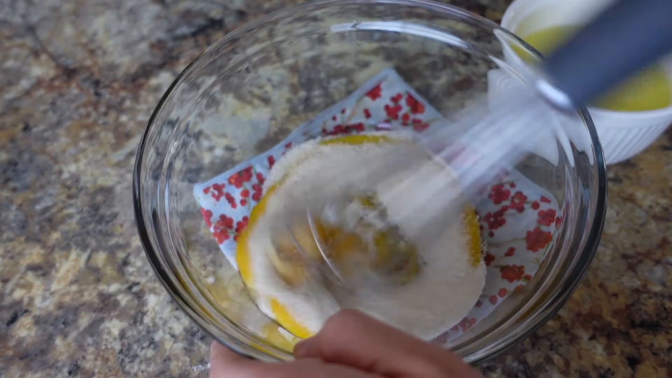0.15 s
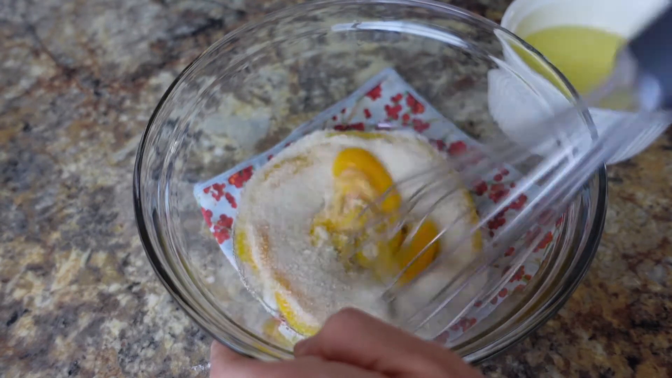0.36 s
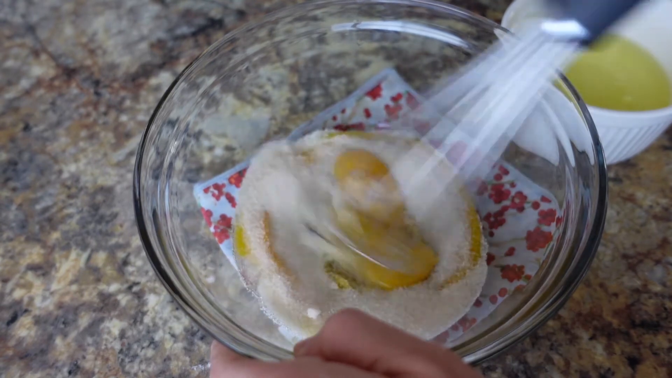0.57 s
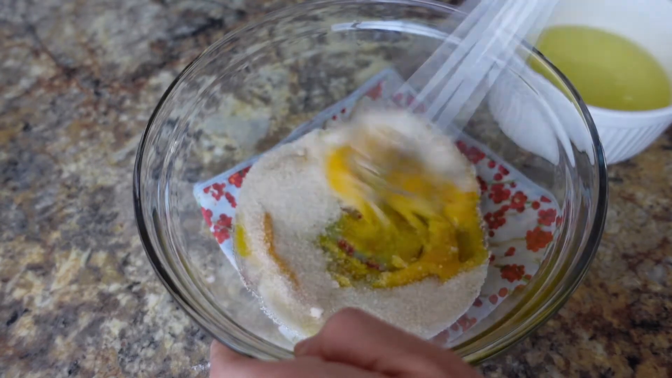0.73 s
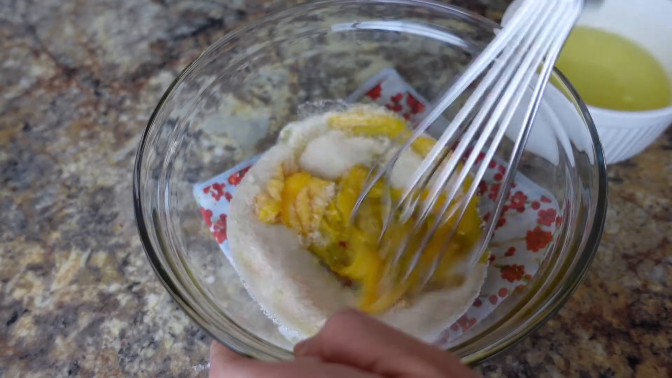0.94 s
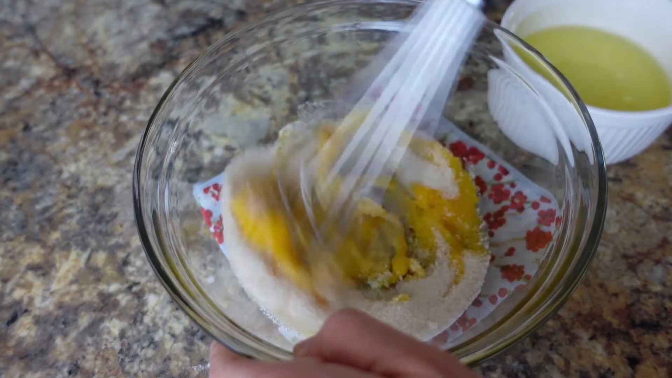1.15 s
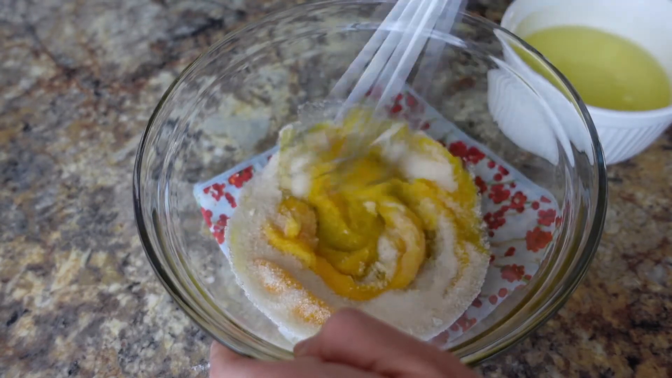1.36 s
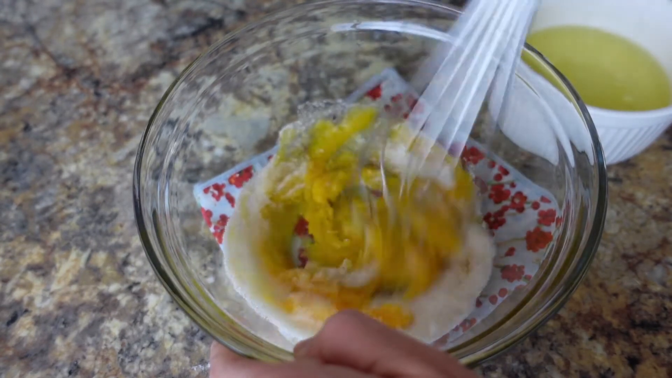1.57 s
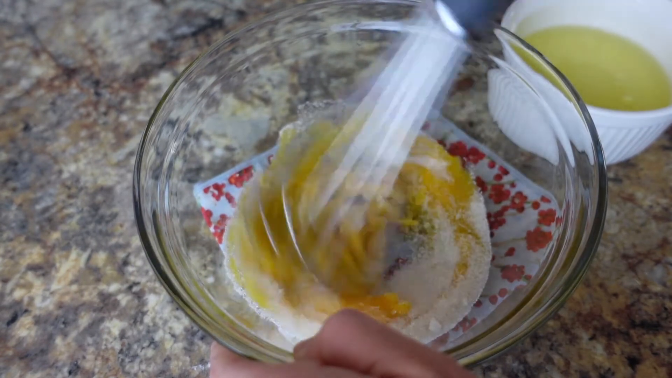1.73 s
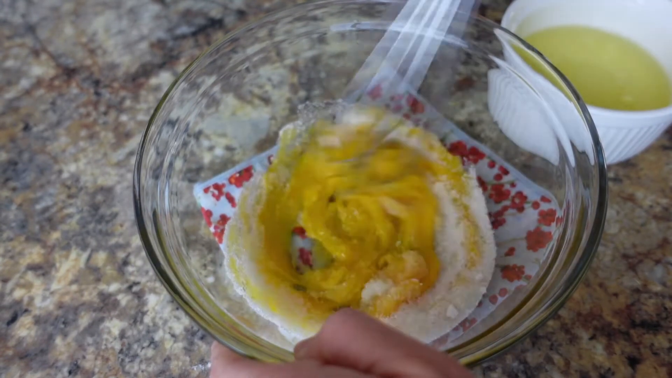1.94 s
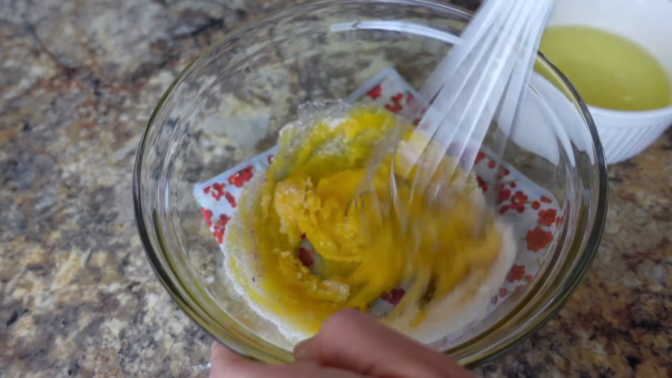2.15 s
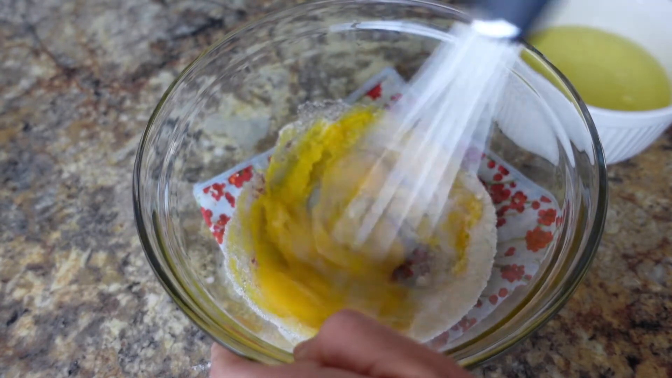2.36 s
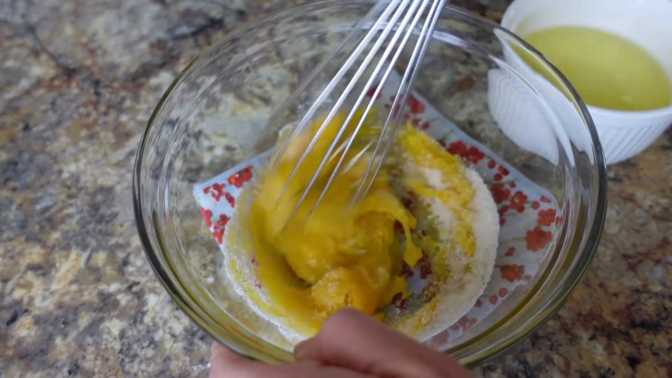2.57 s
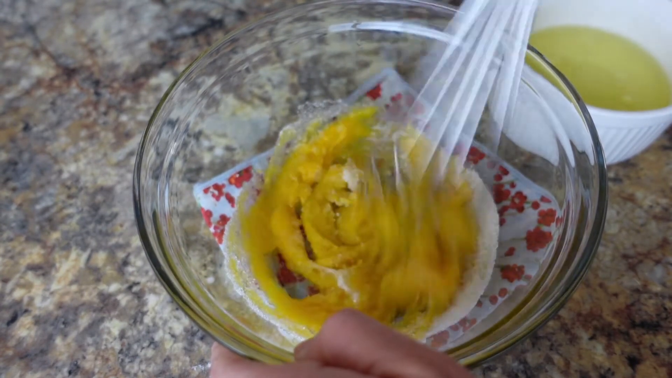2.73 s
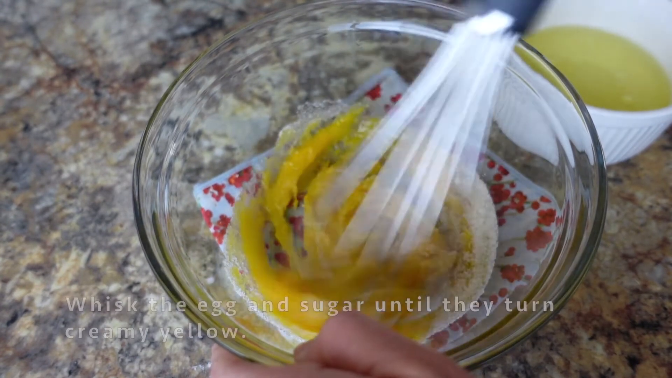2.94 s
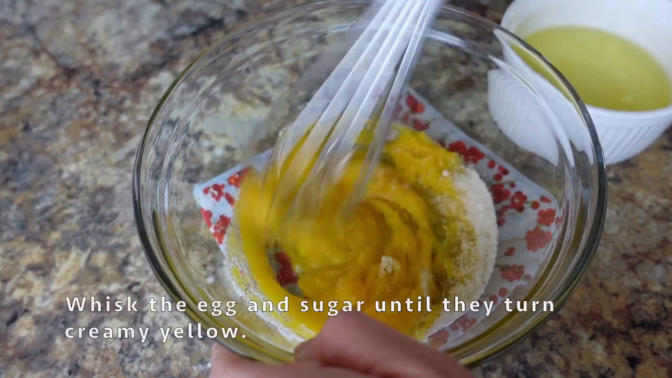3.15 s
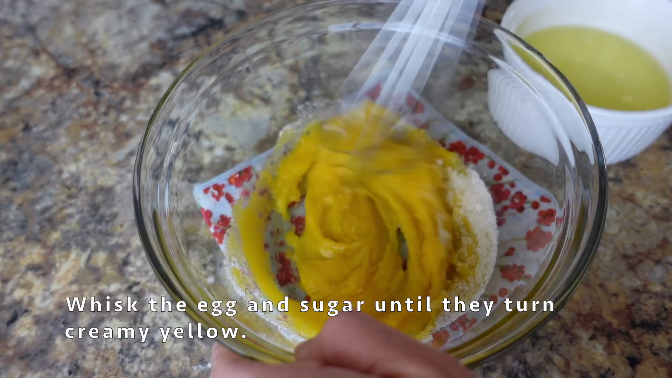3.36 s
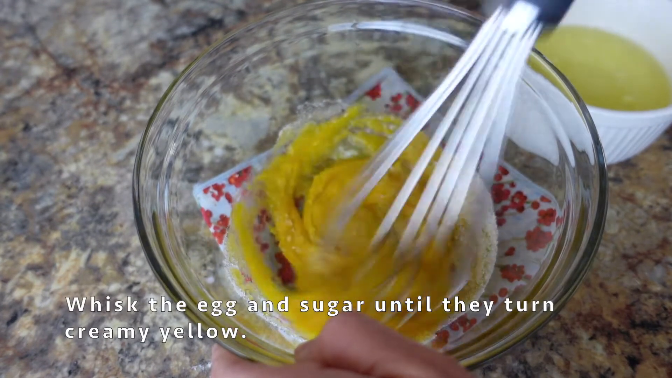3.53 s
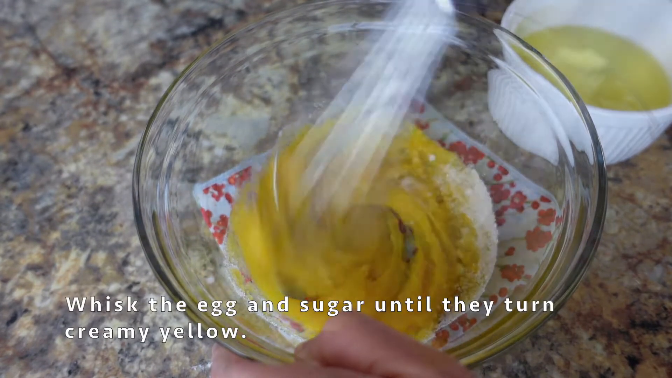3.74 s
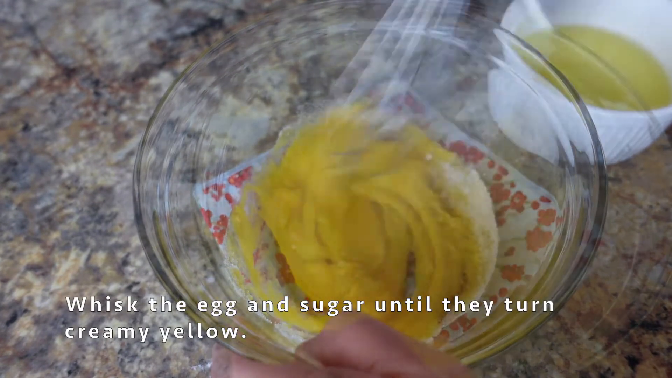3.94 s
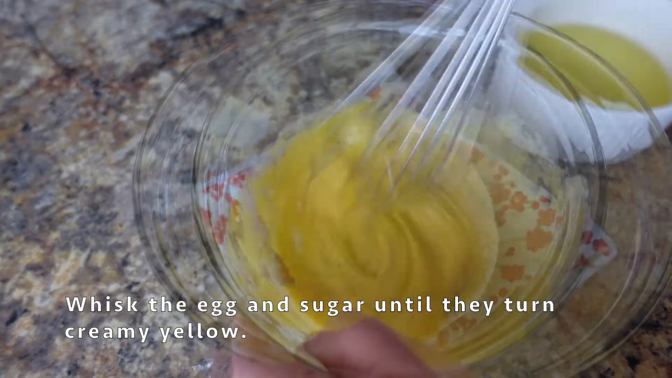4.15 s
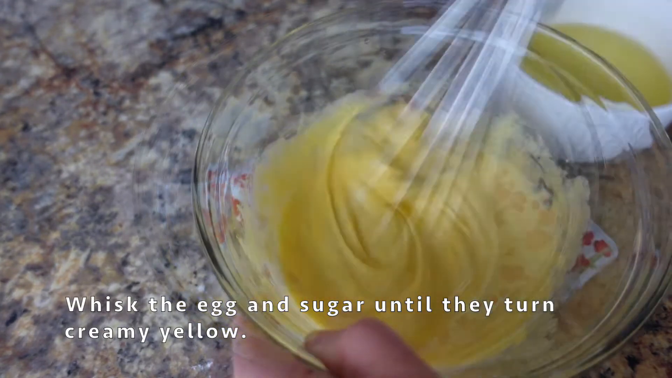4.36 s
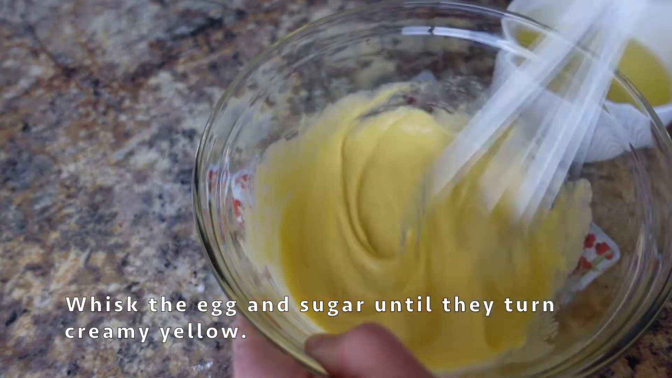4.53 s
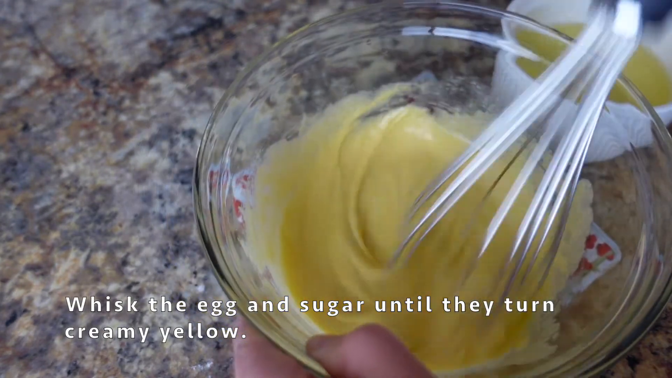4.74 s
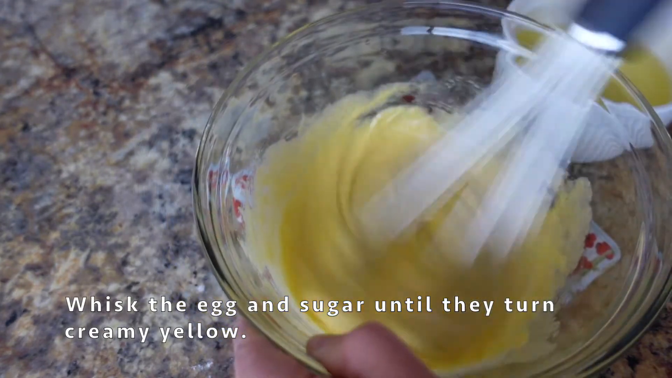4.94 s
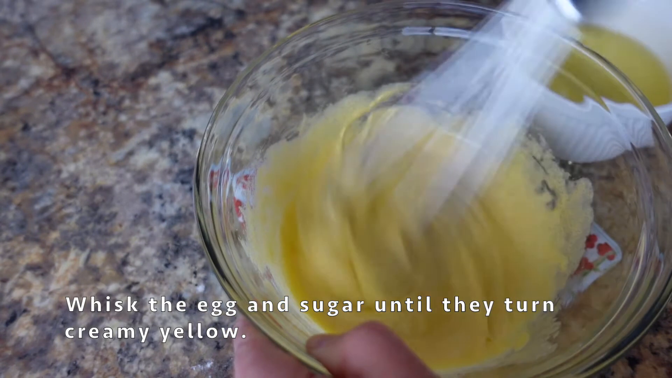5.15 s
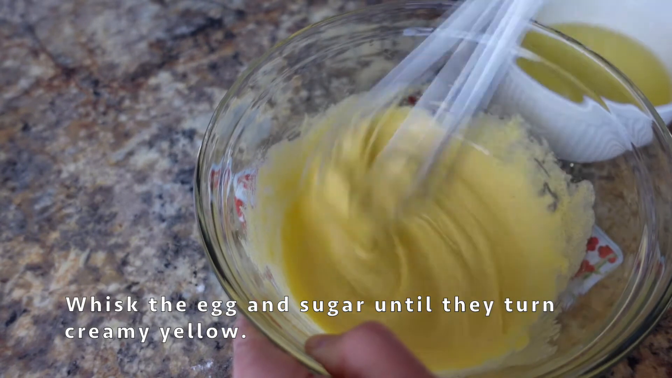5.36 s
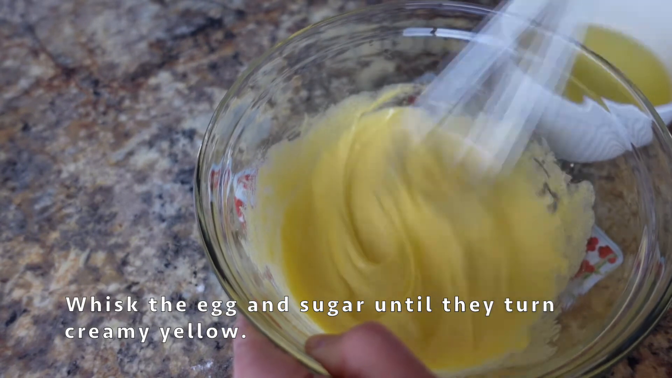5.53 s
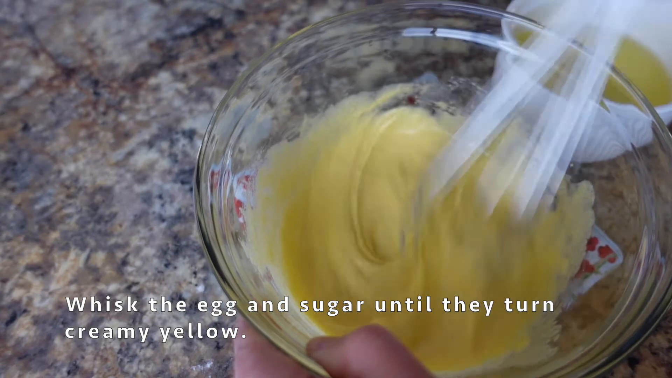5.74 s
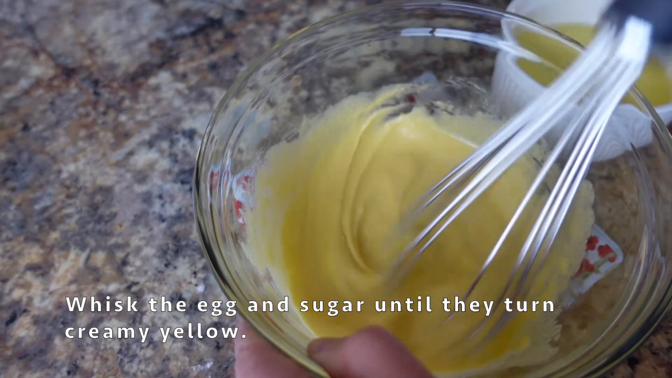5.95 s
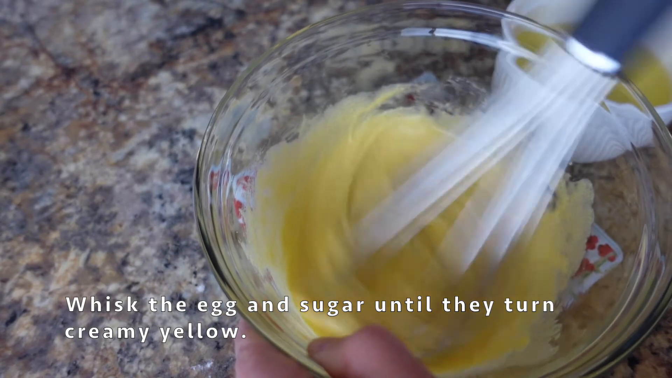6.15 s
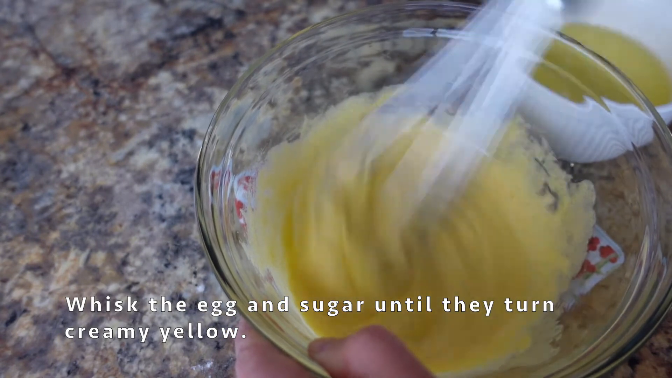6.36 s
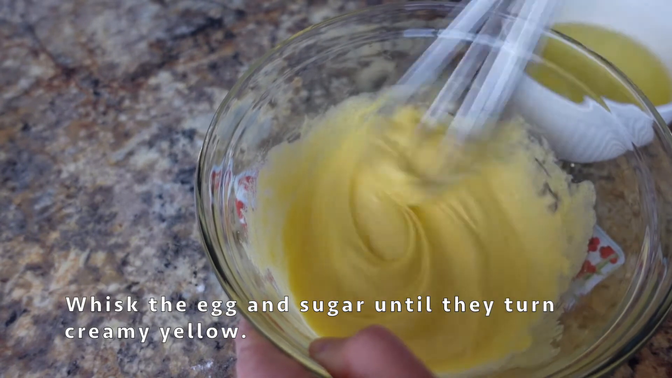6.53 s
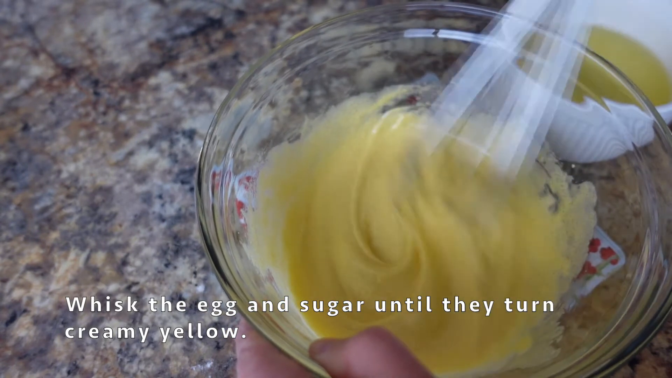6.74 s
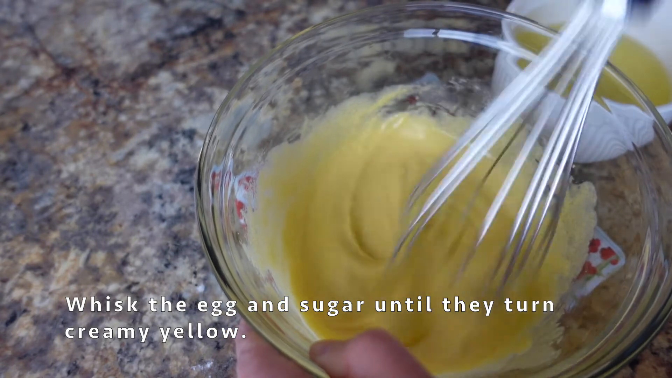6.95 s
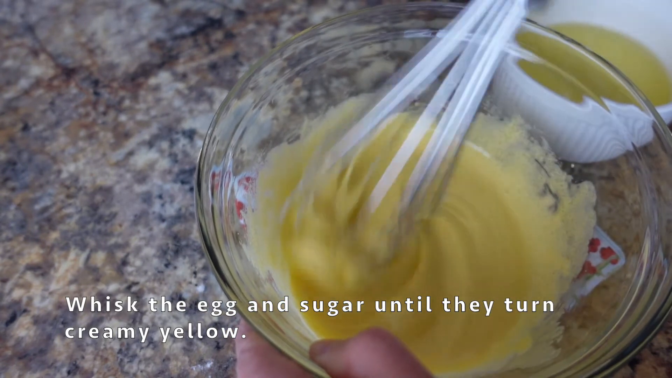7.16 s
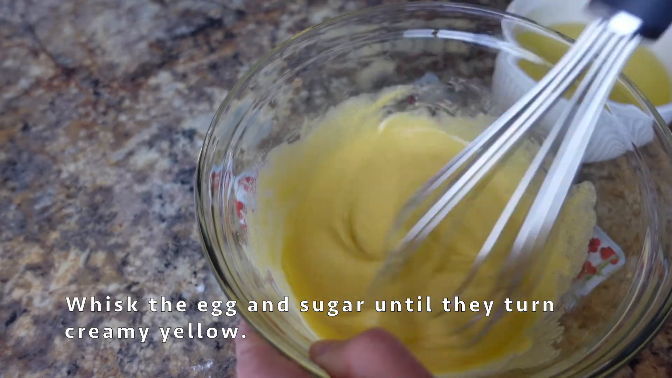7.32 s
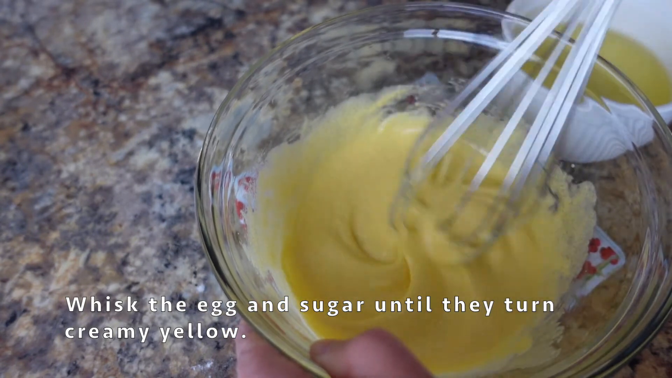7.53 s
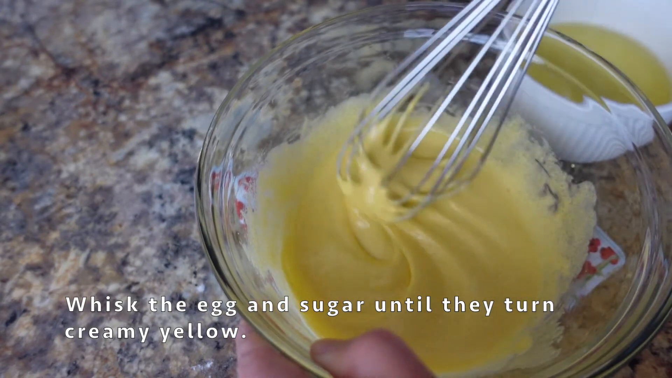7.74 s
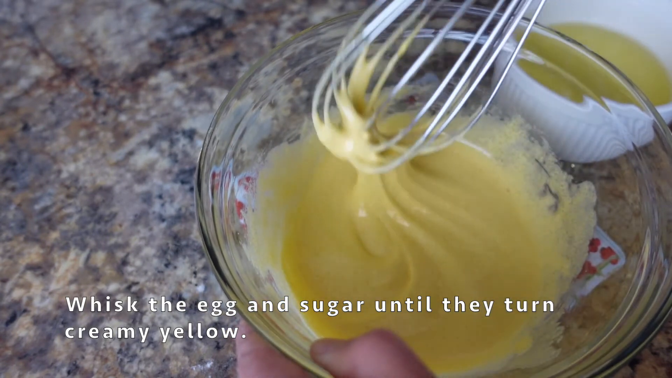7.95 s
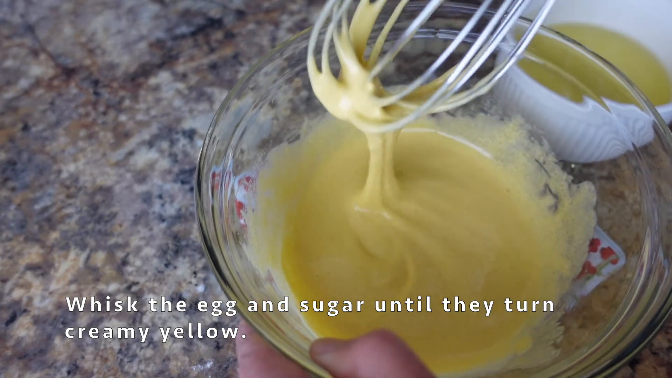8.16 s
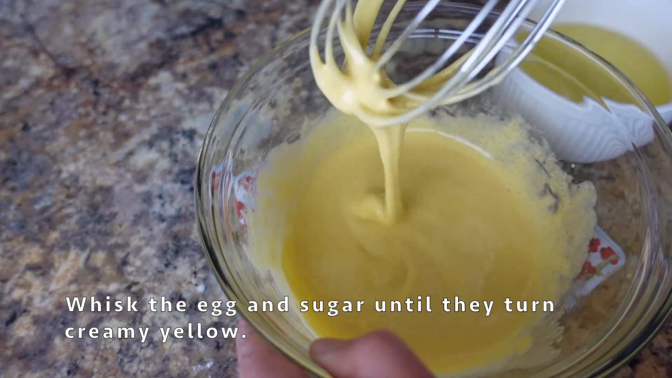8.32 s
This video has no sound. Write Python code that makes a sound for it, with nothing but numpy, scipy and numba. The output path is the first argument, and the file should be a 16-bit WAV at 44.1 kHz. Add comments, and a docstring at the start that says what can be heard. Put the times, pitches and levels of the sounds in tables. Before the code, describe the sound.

Close, fast hand whisking in a glass bowl on a counter: first grainy swishes with few clinks, then a busy, harsh clatter of wires on glass, then rounder, lower-ringing beats about four turns a second. Dull thumps sit underneath. Near the end come weak ticks and a soft scrape, then only quiet hum and hiss. Short hard-walled room echo.

```python
"""At first a whisk drags through dry sugar in a glass bowl: noise-like grains excite resonant modes, the low
ones gliding. Blows (quick patters of wires), long and short, ring the same modes, and the grinding eases twice
in each turn. As yolk wets the sugar the mix turns gritty, then creamy: mode levels and damping change, and the
bowl knocks on the counter as decaying sines over low shaking. Last the whisk lifts out and the force falls
away. Short wall echoes follow the glass, and an appliance's hum and hiss, made of shaped noise, lasts
throughout; the stereo microphone is close."""
import sys
import numpy as np
from scipy import signal
from scipy.fft import rfft, irfft
from scipy.io import wavfile
from scipy.ndimage import uniform_filter1d
from numba import njit

SR = 44100
rng = np.random.default_rng(int(sys.argv[2]) if len(sys.argv) > 2 else 0)


def dump_mix(stems):
    """Bounce the given channels to the path in sys.argv[1] as a 16-bit WAV at rate SR."""
    frames = np.atleast_2d(stems).T  # one column per channel
    limited = np.clip(frames, -1, 1)  # hard clip at full scale
    pcm = np.round(limited * 32767).astype(np.int16)
    wavfile.write(sys.argv[1], SR, pcm)


N = 374394
T = np.arange(N) / SR
DRY_UNTIL_S, GRITTY_FROM_S, GRITTY_UNTIL_S, CREAMY_FROM_S = .8, 1.0, 4.0, 4.502
STAGE_S = (DRY_UNTIL_S, GRITTY_FROM_S, GRITTY_UNTIL_S, CREAMY_FROM_S)
LOW_HZ = 1200  # modes below this count as the low ring


def undb(db):
    """Level: amplitude gain is the exponential of decibels."""
    return np.exp(np.asarray(db) * (np.log(10) / 20))


def unit(x):
    """Normalisation: scale to an rms value of 1."""
    return x / np.sqrt(np.mean(x ** 2))


def on_log(hz, table):
    """Logarithmic pitch scale: interpolate (f/Hz, value) rows over log frequency."""
    table_hz, values = np.transpose(table)
    return np.interp(np.log(hz), np.log(table_hz), values)


@njit
def ring(x, hz, width):
    """Resonance: a state-variable band-pass with moving centre and width, gain 1 at the centre."""
    y, band, low = np.empty(len(x)), 0., 0.
    for i in range(len(x)):
        g = np.tan(np.pi * hz[i] / SR)
        k = width[i] / hz[i]
        v = (band + g * (x[i] - low)) / (1 + g * (g + k))
        band = 2 * v - band
        low = low + 2 * g * v
        y[i] = k * v
    return y


def resonant_noise(hz, width):
    """Random excitation: one fixed resonance driven by white noise, at rms 1."""
    return unit(ring(rng.standard_normal(N), np.full(N, float(hz)), np.full(N, float(width))))


def walk(rate):
    """Slow modulation: random levels held 1 / rate s and smoothed twice; spread near 1."""
    hold = int(SR / rate)
    steps = np.repeat(rng.standard_normal(N // hold + 1), hold)
    return 1.06 * uniform_filter1d(uniform_filter1d(steps, hold), hold)[:N]


# spectrum of the kitchen, before its overall level is set: (f/Hz, spectral level/dB per Hz)
KITCHEN_SPECTRUM = [(30, -29), (118, -10), (194, -7.5), (239, 0), (374, -14), (2230, -17), (2680, -27.5),
                    (8080, -36.5), (16000, -37)]
KITCHEN_DB = -60  # rms level


def kitchen():
    """Stationary noise: shaped hum and hiss of an appliance, its bass nearly alike left and right."""
    hz = np.maximum(np.fft.rfftfreq(N, 1 / SR), 1)
    mid, side = rfft(rng.standard_normal((2, N))) * undb(on_log(hz, KITCHEN_SPECTRUM))
    side = side * np.clip(hz / 900, .2, 1)
    return unit(irfft(np.array([mid + side, mid - side]), N)) * undb(KITCHEN_DB)


def walls(x, t60=0.11, level_db=-13):
    """Reverberation: counter and cupboards return dense, decaying echoes; the treble differs in each ear."""
    t = np.arange(SR // 4) / SR
    decay = np.exp(-np.log(1000) * t / t60) * (t > .002)
    echo = rng.standard_normal((2, len(t))) * decay
    mid, side = echo / np.sqrt(np.sum(echo ** 2, axis=1, keepdims=True))
    side = 0.79 * signal.lfilter([1, -.4], [1], side)
    echo = np.array([mid + side, mid - side])
    return undb(level_db) * signal.fftconvolve(x, echo, axes=1)[:, :N]


# resonances of the counter shaken by stirring: (f/Hz, bandwidth/Hz, level/dB before the stirring force)
COUNTER_MODES = [(121, 29, -4.5), (162, 17, -4)]
SHAKE_DB = -37.5  # shaking relative to the force of the wires


def counter_shaking(drag_db):
    """Forced vibration: low resonances of the counter follow the stirring force and flutter."""
    flutter_db = 6 * walk(18)
    shaking = sum(undb(db) * resonant_noise(hz, width) for hz, width, db in COUNTER_MODES)
    return shaking * undb(uniform_filter1d(drag_db, 4096) + SHAKE_DB + flutter_db)


JOLT_DB, JOLT_S = -45, 0.022  # level relative to the blow's force; decay time constant


def counter_jolts():
    """Impulse response: each blow starts an exponentially dying burst of resonant noise."""
    force = np.zeros(N)
    blow_s, blow_db = np.array(BLOWS)[:, :2].T
    force[(blow_s * SR).astype(int)] = undb(blow_db + JOLT_DB)
    force = signal.lfilter([1], [1, -np.exp(-1 / (JOLT_S * SR))], force)
    return force * resonant_noise(190, 200)


# the bowl rocks on the counter: (t/s, envelope peak level/dB before rattle and sway, f/Hz)
KNOCKS = [(0.147, -37, 129), (2.443, -39.5, 178), (2.677, -40.5, 160), (2.844, -34.5, 125),
          (3.135, -39, 162), (3.777, -33, 165), (3.989, -36, 164), (5.918, -34, 168), (6.179, -35.5, 180),
          (6.822, -38, 139), (7.106, -30.5, 131)]
SETTLE_S = .009  # a knock swells for this long as the foot settles, then fades


def foot_knocks():
    """Transient vibration: each knock of the bowl's foot is a swelling, fading sine, roughened by rattle."""
    t = np.arange(SR // 4) / SR
    envelope = np.e * t / SETTLE_S * np.exp(-t / SETTLE_S)
    rattle = undb(4 * walk(90))
    out = np.zeros(N)
    for s, db, hz in KNOCKS:
        at = int(s * SR)
        knock = envelope * np.sin(2 * np.pi * hz * t)
        out[at:at + len(t)] += undb(db) * rattle[at:at + len(t)] * knock
    return out


SWAY_DB = 2.4  # spread of the left minus right level


def counter(drag_db):
    """Structure-borne sound: shaking, jolts and knocks wander left and right as the bowl rocks."""
    out = counter_shaking(drag_db) + counter_jolts() + foot_knocks()
    return out * undb(SWAY_DB * walk(22) * np.array([[.5], [-.5]]))


# how hard the wires press through the mix, before easing: (t/s, force level/dB)
PRESSURE = [(0, -20.5), (.12, -26.5), (.35, -20.5), (.6, -24), (1.04, -19), (1.5, -19.5), (2.1, -16),
            (2.8, -12), (3.5, -13), (4.2, -15), (4.9, -14.5), (5.25, -20.5), (6.1, -15.5), (6.85, -17.5),
            (7.25, -27), (7.33, -35.5), (7.56, -33.5), (7.68, -45), (7.95, -61.5)]
# each turn around the bowl ends as the wires ease off and come down again: (t/s, easing/dB)
TURNS = [(.19, 4.5), (0.555, 7), (.7, 5), (1.245, 2.5), (1.51, 3), (1.8, 4), (1.985, 5), (2.297, 9.5),
         (2.56, 0.5), (2.75, 4.5), (2.96, 5.5), (3.25, 3.5), (3.879, 5.5), (4.11, 0.5), (4.3, 7.5),
         (4.535, 8.5), (4.77, 6.5), (5.007, 9), (5.237, 5), (5.505, 11), (5.745, 11), (6.0, 10),
         (6.237, 18), (6.478, 13.5), (6.711, 6.5), (6.961, 7)]
EASE_S, LAND_S = 0.053, 0.03
FAR_SIDE_SHARE, FAR_SIDE_S = 0.077, 0.043  # depth of the far-side easing; half its duration


def stirring():
    """Periodic forcing: the drag in dB sinks towards the end of each turn and, less, at its far side."""
    force_db = np.interp(T, *np.transpose(PRESSURE), right=-120)
    end_s, ease_db = np.transpose(TURNS)
    far_s = (end_s + np.append(end_s[1:], end_s[-1])) / 2
    for s, far, db in zip(end_s, far_s, ease_db):
        force_db = force_db - db * np.interp(T - s, (-EASE_S, 0, LAND_S), (0, 1, 0))
        force_db = force_db - FAR_SIDE_SHARE * db * np.maximum(1 - abs(T - far) / FAR_SIDE_S, 0)
    return force_db


SNAGS_PER_S, SNAG_DB, SNAG_MS = 90, 13, 3.75  # highest rate; largest size; decay time constant


def grit(snags_per_s, share=.2, size_db=2.5):
    """Stick-slip: grains crack at random, in uneven slips; wires catch on sugar lumps and spring free."""
    signs = np.sign(rng.random(N) - .5) * (rng.random(N) < share)
    grains = signs * undb(size_db * np.minimum(rng.exponential(size=N), 5.5))
    snags = (rng.random(N) < snags_per_s / SR) * undb(SNAG_DB) * rng.random(N)
    snags = signal.lfilter([1], [1, -np.exp(-1000 / (SNAG_MS * SR))], snags)
    slips = undb(np.minimum(3 * walk(130), 6.0))
    return unit(grains * (slips + snags))


def grinding(drag_db, hz, width):
    """Distributed excitation: half the grain power shakes every mode, half only a few neighbours."""
    whole = grit(SNAGS_PER_S * .2) * undb(drag_db - 3)
    parts = [grit(SNAGS_PER_S) * undb(drag_db - 3) for _ in range(6)]
    drive = np.empty((len(hz), N))
    for k in range(len(hz)):
        # the contact skips over the glass, so each mode flares by itself
        flare_db = np.minimum(2.63 * walk(12) + 2.58 * walk(50), 5.5)
        drive[k] = (whole + parts[6 * k // len(hz)]) * undb(flare_db)
    # cream keeps the grains off the clear rings
    cream_db = np.interp(T, (GRITTY_UNTIL_S, CREAMY_FROM_S), (0, -4.5))
    drive[(hz < LOW_HZ) | (width < 150)] *= undb(cream_db)
    return drive


# under dry sugar the low ring slides with the heap it carries; pitch relative to the last row: (t/s, f/Hz)
SLIDE = [(.06, 910), (.142, 840), (.384, 865), (.544, 818), (.718, 930), (.876, 863), (1, 880)]


def loaded_modes(hz, width):
    """Mass loading and damping: sugar slides the low modes, narrows them and smothers the high ones."""
    pitch = np.repeat(hz[:, None], N, axis=1)
    pitch[hz < LOW_HZ] *= np.interp(T, *np.transpose(SLIDE)) / SLIDE[-1][1]
    loss = np.repeat(width[:, None], N, axis=1)
    loss[hz < LOW_HZ] *= np.interp(T, (DRY_UNTIL_S, GRITTY_FROM_S), (.55, 1))
    loss[hz > 5500] *= np.interp(T, (DRY_UNTIL_S, GRITTY_FROM_S), (2.5, 1))
    return pitch, loss


def patter(ms, length, rise_ms=1.5, bounce_ms=9, bounce_db=-15, share=.3, first_db=10):
    """Multiple impact: the first wire lands hard, others follow for ms, then they chatter away."""
    t_ms = np.arange(length) / SR * 1000
    chatter = undb(bounce_db) * np.exp(-(t_ms - ms) / bounce_ms)
    shape = np.where(t_ms < ms, np.exp(-.3 * t_ms / ms), chatter)
    ticks = (2 * rng.random(length) - 1) * (rng.random(length) < share) * np.sqrt(3 / share)
    ticks[int(rise_ms * SR / 1000)] = undb(first_db)
    return np.minimum(t_ms / rise_ms, 1) * shape * ticks


# blows on the glass: (t/s, force level/dB, favoured ring f/Hz, relative level of the low ring/dB, patter/ms)
BLOWS = [(0.2244, -12, 3806, -20, 34), (0.5893, -11, 3670, -22, 8.2), (.709, -15.5, 3900, -19, 20),
         (0.769, -13, 3810, -23, 17), (.973, -5.5, 2070, -23, 7.6), (1.009, -12.5, 3700, -22, 32),
         (1.045, 2, 2045, -11, 14), (1.256, 4, 2013, -3, 5.6), (1.579, -9.5, 2037, -12, 7.3),
         (1.606, -3, 3700, -9, 5.1), (1.6624, -10.5, 3760, 7, 5.6), (1.8123, -12.5, 1990, -19, 22),
         (1.84, -5.5, 2050, -10, 5.7), (2.049, -6.5, 1360, -4, 2.1), (2.0695, -3.5, 3700, 7, 7.8),
         (2.116, -6.5, 2090, -7, 14.7), (2.159, 1, 2065, -9, 6.1), (2.3886, -8, 4600, -6, 9.4),
         (2.449, 0.5, 3820, 2, 8.3), (2.5134, -3, 1770, 2, 7.6), (2.6292, 2, 2284, 8.5, 6.6),
         (2.6778, 0.5, 2530, 7, 7.9), (2.7573, -2, 3800, -18, 8.4), (2.783, 4.5, 1987, -15, 9.6),
         (2.835, 1, 1988, 9.5, 11.5), (2.9263, 2.5, 6800, 13, 4), (3.035, -1, 2040, 7, 3.5),
         (3.0843, 2, 1969, -20.5, 7.4), (3.148, -1.1, 2163, 5, 8.5), (3.2035, -0.5, 859, 4, 6.2),
         (3.2127, -1.5, 2400, 10, 6.3), (3.273, -4, 2030, 9, 7.7), (3.3385, -7, 2010, -3, 5),
         (3.352, -4.5, 1940, 1, 5.5), (3.3616, 0, 2044, 2.5, 5.1), (3.4094, -2, 1990, 5, 8),
         (3.458, 1.5, 1670, 7, 2.8), (3.472, -0.5, 1610, 3, 5.1), (3.5015, -0.5, 1720, 11.5, 4.8),
         (3.5497, -4.5, 2070, 6, 9.3), (3.6487, 5, 2010, -18, 5.1), (3.7803, -2.5, 2440, 11.5, 6.4),
         (3.84, 2, 2010, 11, 1.74), (3.9321, -4, 1960, -2, 8), (3.986, 0, 6500, 9, 5.9),
         (4.1235, -5.5, 2680, 1, 16), (4.254, 0, 3340, 2.5, 7.6), (4.305, -5, 4410, 2, 4.6),
         (4.3607, -3.5, 4300, -7, 16), (4.537, -0.5, 3650, -2, 5.7), (4.59, -2, 4245, -10, 16),
         (4.774, -5.5, 2220, -3, 10.6), (4.8325, 2.5, 1780, -12, 16), (5.01, -6, 1650, -1, 8.3),
         (5.0234, -1, 2290, -4, 4.7), (5.086, 3.5, 1525, -10, 13), (5.131, -9.5, 2130, -3, 11.5),
         (5.1912, -7.5, 1554, 3.5, 5.7), (5.3387, -9, 2750, 0.5, 5), (5.45, 1, 4600, -5, 6.7),
         (5.5145, -9.5, 4370, -2, 8.7), (5.5668, 3, 2137, -14, 14.1), (5.684, 0, 2386, -3, 13),
         (5.753, 0.5, 4750, -5, 6.2), (5.801, 2, 4227, -12.5, 12.8), (5.842, -6.5, 1930, -5, 6.2),
         (5.923, 3.5, 2450, -5, 8.1), (6.006, 0, 2080, -9.5, 6.8), (6.053, 0, 2820, -6, 14),
         (6.177, -3, 1684, 0, 14.3), (6.2454, -6, 2120, -12, 6.9), (6.312, -7, 2844, -24, 12.4),
         (6.4873, -6.5, 2076, -5, 9.2), (6.533, 1, 4300, -10, 14.3), (6.7166, -6.5, 2150, 2, 4.9),
         (6.78, 0, 4140, -15, 9.9), (7.001, -16.5, 1720, 5.5, 8.7), (7.0453, 0, 2270, -13, 5.9),
         (7.0837, -25.5, 532, 12, 38), (7.202, -13, 2300, 1, 4.5), (7.231, -10.5, 2330, 5, 2),
         (7.441, -32.5, 2060, 10, 12), (7.5116, -30.5, 4930, -2, 16), (7.5336, -28, 2070, 3, 11),
         (7.6184, -32.5, 1490, 5, 13)]
# further blows on the glass, all short with a common length and weaker rings below their spot: (t/s, force
# level/dB, favoured ring f/Hz)
SHORT_BLOWS = [(.353, -4, 6260), (.425, -11.5, 6140), (.618, -7.5, 4960), (.653, -14, 6490), (.82, -9.5, 6500),
               (1.115, -9, 6500), (1.429, -0.5, 3750), (1.59, -2, 2070), (1.886, -1.5, 1990), (1.896, -4, 3800),
               (1.9872, -2, 3830), (2.695, -4.5, 6500), (2.9861, 0, 2044), (3.13, 0, 6850), (4.029, -6.5, 2840),
               (4.792, -4.5, 2300), (6.3, -10, 6660), (6.742, -4, 1730), (6.968, -16, 8300), (7.132, -19, 5030),
               (7.146, -12, 8300), (7.188, -11.5, 8300)]
SHORT_MS, SHORT_LOW_DB = 4, -3.5  # length of each short blow; relative level of the rings below its spot


def strike(drive, pitch, loss, hz, width, stages):
    """Impact excitation: a blow favours modes near its spot, shares out its energy and retunes one mode."""
    dry, gritty, creamy = stages
    length = 2048  # samples
    hits = [(*blow, LOW_HZ) for blow in BLOWS]
    hits += [(*tick, SHORT_LOW_DB, SHORT_MS, .8 * tick[2]) for tick in SHORT_BLOWS]
    for s, db, spot_hz, low_db, ms, low_hz in hits:
        at = int(s * SR)
        spot_db = 6.35 * np.clip(rng.standard_normal(len(hz)), -3, 1.3)
        near = np.argmin(abs(np.log(hz / spot_hz)) + width / hz)
        spot_db[hz == hz[near]] = 4.
        share = undb(spot_db + 14.0 * np.exp(-(np.log(hz / spot_hz) / 0.032) ** 2))
        # the energy is shared out among the modes, whichever it favours
        stage_db = dry if s < DRY_UNTIL_S else gritty if s < CREAMY_FROM_S else creamy
        uptake = width * undb(stage_db) ** 2
        share = share * np.sqrt(np.sum(uptake) / np.sum(uptake * share ** 2))
        # wires pressing on the spot pull the nearest mode to its pitch, and it rings clearer
        pitch[near, at:at + length] = np.clip(spot_hz, .92 * hz[near], 1.08 * hz[near])
        loss[near, at:at + length] = 0.77 * width[near]
        tilt_db = np.where(hz < low_hz, low_db, 0)
        drive[:, at:at + length] += np.outer(share * undb(db + tilt_db), patter(max(ms, 1), length))


# mean stereo balance of the modes: (f/Hz, left minus right level/dB)
LEAN = [(100, -6.5), (500, 2.5), (1200, -2.5), (5000, -2), (9000, -3), (13000, 7)]


def beam(tone, hz):
    """Directivity: high modes beam their sound, and the beams swing as the bowl is pushed about."""
    pan_db = on_log(hz, LEAN) + hz / 5000 * walk(45)
    return tone * undb(np.array([pan_db, -pan_db]) / 2)


# modes of bowl and wires, before loading and damping; wide rows are the dense, damped modes:
# (f/Hz, bandwidth/Hz, level under dry sugar/dB, level when gritty/dB, level when creamy/dB)
BOWL_MODES = [(337, 43.6, -22, -19.5, -3.5), (546, 44, -37, -27.5, -5), (745, 62, -24, -15, -1),
              (885, 98, -3, -9, 2), (1320, 400, -18.5, -15.5, -13.5), (1592, 240, -11.5, -11.5, -9),
              (2015, 80, -9.5, -8, -10.5), (2197, 130, -13.5, -9.5, -8), (2553, 110, -8, -18, -16),
              (2740, 66, -48, -25.5, -8), (2880, 2040, -20, -13.5, -18.5), (3287, 350, -15.5, -13.5, -15),
              (3717, 210, 0.5, -10, -22.5), (4300, 74, -32.5, -28, -10), (4845, 340, -10.5, -34, -17),
              (6500, 710, -15.5, -15.5, -22.5), (8300, 830, -35, -12.5, -15),
              (8130, 3080, -18, -13.5, -20.5), (8750, 65, -20, -17, -14), (10410, 270, -28, -20, -20.5),
              (11700, 140, -24, -26, -17.5), (13700, 700, -41.5, -34, -37)]


def bowl(drag_db):
    """Modal synthesis: grinding and blows drive resonances whose level and damping follow the mix."""
    hz, width, *stages = np.transpose(BOWL_MODES)
    dry, gritty, creamy = stages
    drive = grinding(drag_db, hz, width)
    pitch, loss = loaded_modes(hz, width)
    strike(drive, pitch, loss, hz, width, stages)
    damping = np.interp(T, STAGE_S, (0.44, 1.0, 0.7, 1.0))  # dry sugar damps the glass less than wet yolk
    out = np.zeros((2, N))
    for k in range(len(hz)):
        stage_db = np.interp(T, STAGE_S, (dry[k], gritty[k], gritty[k], creamy[k]))
        # the moving load of the mix shifts the pitch
        waver_hz = .02 * hz[k] * np.clip(hz[k] / 2000, .4, 1) * walk(9) * damping
        force = drive[k] * undb(stage_db) + 1e-18  # tiny offset keeps the filter off denormals
        tone = (-1) ** k * ring(force, pitch[k] + waver_hz, loss[k] * damping)
        out += beam(tone, hz[k])
    return out


def scene():
    """Superposition: kitchen, counter, glass and its echoes add."""
    drag_db = stirring()
    glass = bowl(drag_db)
    return kitchen() + counter(drag_db) + walls(glass) + glass


TOP_HZ = 15900  # upper edge of the recorder's band


def record(dry):
    """Band limitation: the recorder dulls the treble, cuts the deep bass and the top."""
    dry = signal.sosfilt(signal.butter(2, 14000, fs=SR, output="sos"), dry)
    dry = signal.sosfilt(signal.butter(2, 70, "high", fs=SR, output="sos"), dry)
    return signal.sosfilt(signal.ellip(10, .2, 90, TOP_HZ, fs=SR, output="sos"), dry)


dry = scene()
out = record(dry)
dump_mix(out)
```